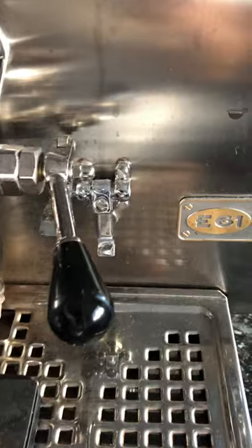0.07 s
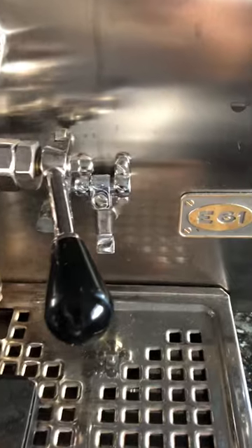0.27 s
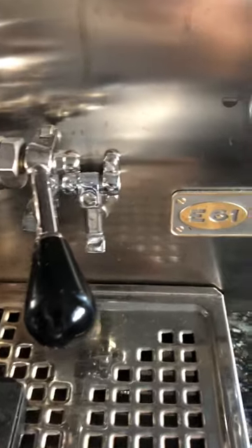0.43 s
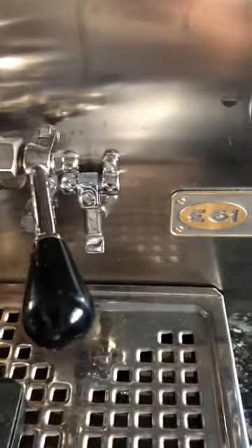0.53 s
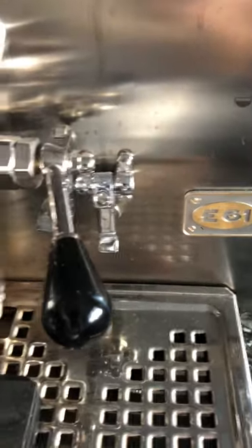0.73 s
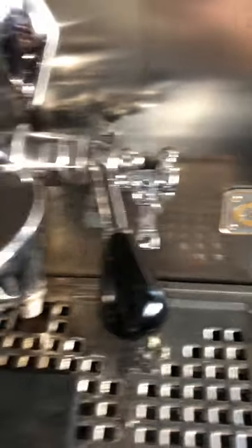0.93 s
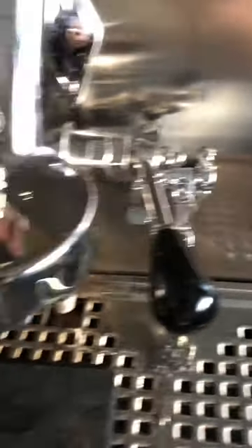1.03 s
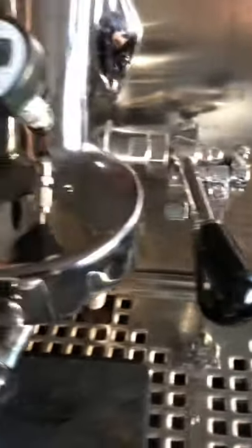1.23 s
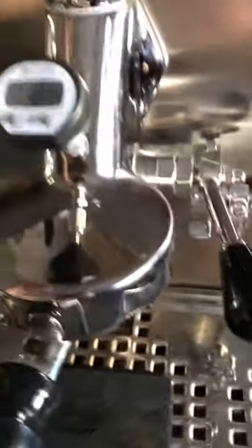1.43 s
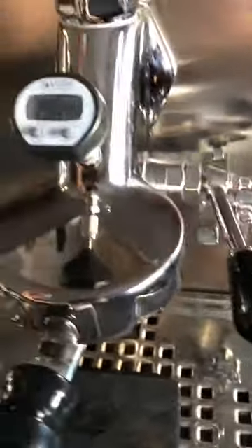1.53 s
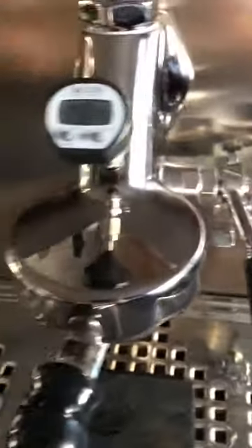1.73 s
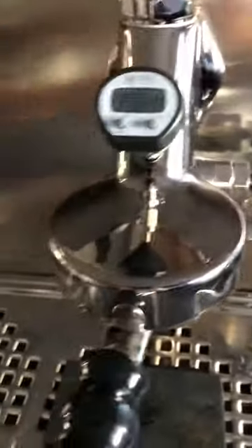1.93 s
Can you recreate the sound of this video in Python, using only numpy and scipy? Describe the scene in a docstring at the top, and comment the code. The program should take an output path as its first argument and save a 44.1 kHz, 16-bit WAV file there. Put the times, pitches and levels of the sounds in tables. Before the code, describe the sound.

An espresso machine's steel lever snaps over at about 0.2 seconds with a sharp clack and quick rebound, briefly ringing the sheet-metal casing. From 0.5 to 1 second, smaller irregular clicks and rattles follow, with a bright clink near 0.7. A soft, low thump comes around 1.1 seconds. Then only the quiet room's low hum remains, with a very faint brushing near 1.8 seconds.

```python
"""Espresso machine lever clack

A steel brew lever snaps over with a clack; small clicks and rattles follow as parts settle.
Every contact shakes the sheet-metal casing, and some ring the lever or a small steel pin.
The quiet room answers briefly over a low hum; late on, something brushes faintly."""
import sys
import numpy as np
from scipy import signal
from scipy.fft import rfft, irfft, next_fast_len
from scipy.io import wavfile
from scipy.ndimage import map_coordinates

SR = 44100
rng = np.random.default_rng(int(sys.argv[2]) if len(sys.argv) > 2 else 0)


def unload_audio(sound):
    """Save the sound as a 16-bit wav file, at the path given as the first command line argument."""
    columns = np.transpose(np.atleast_2d(sound))
    # keep every value between -1 and 1, then stretch to whole-number steps
    steps = np.round(np.clip(columns, -1, 1) * 32767)
    wavfile.write(sys.argv[1], SR, steps.astype(np.int16))


N = 88200
SCENE_T, HIT_T = np.arange(N) / SR, np.arange(SR) / SR  # seconds into the scene, into one hit


def amp(db):
    return 10 ** (np.asarray(db) / 20)


def along(points, hz):
    """Read a curve of (hz, value) points on a log frequency axis."""
    point_hz, values = np.transpose(points)
    return np.interp(np.log(hz + 1), np.log(point_hz + 1), values)


def filtered(x, gain):
    """EQ x with a gain that depends on frequency."""
    size = next_fast_len(len(x) + 8192)
    return irfft(rfft(x, size) * gain(np.fft.rfftfreq(size, 1 / SR)), size)[:len(x)]


def wobble(knots_per_s):
    """A smooth random curve."""
    return map_coordinates(rng.standard_normal(256), [SCENE_T * knots_per_s], mode="wrap")


def hiss(spectrum):
    """Coloured noise of rms 1."""
    noise = filtered(rng.standard_normal(N), lambda f: amp(along(spectrum, f)))
    return noise / np.sqrt(np.mean(noise ** 2))


def envelope(hz, t60, contact_s=0.000042, build_cycles=0.74):
    """A struck part builds over a cycle or so, then decays freely."""
    attack = 1 - np.exp(-HIT_T / (contact_s + build_cycles / hz))
    return attack * np.exp(-np.log(1000) * HIT_T / t60)


def ring(modes, scatter_db=0.3):
    """Decaying modes, a little different at each blow."""
    out = np.zeros(SR)
    for hz, db, t60 in modes:
        level = amp(db + scatter_db * rng.normal())
        out += level * np.sin(2 * np.pi * (hz * HIT_T + rng.random())) * envelope(hz, t60)
    return out


# Colour of the room tone: freq_hz, gain_db
ROOM_TONE_EQ = [(25, -32.5), (70, -8), (150, -13.5), (280, -12), (650, -22), (1200, -29), (2500, -36.5),
                (16000, -44)]
def room_tone(level_db=-62):
    """Steady, dark noise of a quiet room."""
    return amp(level_db) * hiss(ROOM_TONE_EQ)


# Level ride of the lowest hum tone: time_s, level_db
DRONE_RIDE = [(0.16, -61.5), (0.4, -75), (0.95, -62.5), (1.19, -62), (1.3, -70), (1.65, -62), (2, -71)]
# Steady tones above it: pitch_hz, level_db
HUM_TONES = [(120, -70), (238, -69.5)]
def hum(drone_hz=66.1, drift_rad=0.25):
    """Three low tones drift in phase; the lowest swells and sinks."""
    drone_db = np.interp(SCENE_T, *np.transpose(DRONE_RIDE))
    return sum(np.sqrt(2) * amp(db) * np.sin(2 * np.pi * hz * SCENE_T + drift_rad * wobble(4.6))
               for hz, db in [(drone_hz, drone_db)] + HUM_TONES)


# Colour of the brush: freq_hz, gain_db
BRUSH_EQ = [(3000, -11), (8500, -2), (11000, -8), (15000, -1)]
def brush(peak_s=1.785, width_s=0.052, peak_db=-72.5):
    """Something brushes faintly: one soft swell of bright hiss."""
    return amp(peak_db) * np.exp(-((SCENE_T - peak_s) / width_s) ** 2) * hiss(BRUSH_EQ)


# Reverb decay: freq_hz, t60_s
ROOM_DECAY = [(100, 0.74), (700, 0.47), (2000, 0.54), (6000, 0.49), (13000, 0.3)]
# Reverb colour: freq_hz, gain_db
ROOM_EQ = [(100, 1.5), (800, -4), (2000, -2), (6500, -6.5), (13000, -3.5)]
def room(x, build_s=0.0073):
    """Diffuse answer of the room; the treble dies first."""
    hz, t, noise = signal.stft(rng.standard_normal(SR), SR, nperseg=256)
    rate = np.log(1000) / along(ROOM_DECAY, hz)[:, None]
    gain = amp(along(ROOM_EQ, hz))[:, None] * np.sqrt(2 * rate / SR) * np.exp(-rate * t)
    tail = signal.istft(noise * gain, SR, nperseg=256)[1][:SR]
    fade_in = 1 - np.exp(-(HIT_T / build_s) ** 2)
    return signal.fftconvolve(x, tail * fade_in)[:SR]


RING_SEND_DB, NOTE_SEND_DB = -13, -5  # less reverb keeps ringing parts and notes even and short
def place(out, start_s, direct, send=None):
    """Mix in one hit, with the room's answer to its reverb send if it has one."""
    out[round(start_s * SR):][:SR] += direct if send is None else direct + room(send)


# Modes of the casing panels: pitch_hz, gain_db, t60_s
PANEL_MODES = [(483, -17, .5), (705, -18, .3), (790, -13, .25), (941, -9, .22), (1021, -14, .25),
               (1583, -21, .3)]
def panels(db):
    """The sheet-metal panels ring on after a touch."""
    return amp(db) * ring(PANEL_MODES)


# Soft touches: start_s, gain_db
SOFT_TOUCHES = [(0.1915, -35.5), (0.599, -41), (1.068, -42)]
def nudges(out):
    """Touches so light that they only stir the panels."""
    for start_s, db in SOFT_TOUCHES:
        place(out, start_s, panels(db))


def casing_boom(out, start_s=1.075, pitch_hz=123.7, level_db=-46, t60_s=0.49):
    """The casing's lowest mode, set off as the last part settles."""
    place(out, start_s, ring([(pitch_hz, level_db, t60_s)]))


# Thud, panel, clank, clink and crack bands: centre_hz
BAND_CENTRES = [200, 1000, 3300, 6800, 12000]
# Colour of the shell, on top of the band levels: freq_hz, gain_db
SHELL_EQ = [(50, -35), (130, -5), (280, -4), (600, -2.5), (850, 3), (1300, -0.5), (2300, -2.5), (3050, -3),
            (3900, -5.5), (5000, -6), (5800, -2), (7400, -0.5), (8400, -12), (10400, -5.5), (11700, -5),
            (16000, -10.5)]
def shell(t60, levels_db, width_hz=(300, 1400, 2500, 3000, 6500), stretch=(1.6, 1.1, .95, .95, .9)):
    """Crowded, quickly dying resonances of the machine: five noise bands, the lows lasting longest."""
    density_db = [(hz, db - 10 * np.log10(2 * width / SR))
                  for hz, db, width in zip(BAND_CENTRES, levels_db, width_hz)]
    noise = filtered(rng.standard_normal(SR), lambda f: amp(along(density_db, f) + along(SHELL_EQ, f)))
    out = np.zeros(SR)
    for hz, factor, share in zip(BAND_CENTRES, stretch, np.eye(len(BAND_CENTRES))):
        band = filtered(noise, lambda f: along(list(zip(BAND_CENTRES, share)), f))
        out += band * envelope(hz, t60 * factor)
    return out


# Knock, clank and clink notes: gain_db, t60_s
NOTE_SHAPES = [(1, 0.044), (0, 0.045), (2.5, 0.043)]
def notes(note_hz, levels_db, spread=.05, side_db=-8.5):
    """The point of contact favours three short notes; each beats with a weaker mode on either side."""
    modes = [(hz, level + db, t60) for hz, level, (db, t60) in zip(note_hz, levels_db, NOTE_SHAPES)]
    sides = [(hz * (1 + way * spread * (.5 + rng.random())), db + side_db, t60)
             for hz, db, t60 in modes for way in (-1, 1)]
    return ring(modes + sides)


# The clack and the settling clicks: start_s, knock_hz, clank_hz, clink_hz,
# thud_db, panel_db, clank_db, clink_db, crack_db, notes_over_shell_db, base_t60_s
CONTACT_HITS = [ (0.2005, 786, 2850, 6900, -46, -43, -37, -45, -40, -1, .08),
                (0.2076, 760, 3170, 6410, -34, -29.5, -30.5, -28.5, -42, 1.5, .13),
                (0.230, 962, 2660, 7400, -40.5, -33, -38.5, -29.5, -43, 2.5, .12),
                (0.5073, 773, 3150, 6940, -47, -39.5, -39, -43, -67.5, 6.5, 0.089),
                (0.5373, 1142, 2410, 7400, -40.5, -38.5, -49, -52.5, -71, 0.5, 0.11),
                (0.6128, 903, 3490, 7133, -39.5, -40, -37, -34, -58, -0.5, 0.072),
                (0.6755, 907, 2946, 5880, -41.5, -42, -35.5, -28.5, -47, 0.5, 0.054),
                (0.7123, 873, 2330, 5800, -48.5, -38, -48, -49, -72, 0, 0.073),
                (0.7174, 929, 2180, 5600, -54, -31.5, -40, -34.5, -57, -5.5, 0.039),
                (0.738, 901, 2150, 6250, -42, -39, -65, -44, -76, 3, 0.085),
                (0.8166, 1145, 1533, 6860, -49, -37, -42.5, -40.5, -60, 0.5, 0.044),
                (0.8637, 1260, 2070, 5900, -39.5, -38, -41, -47.5, -58, 1, 0.067),
                (0.9033, 907, 2020, 5900, -42, -38.5, -54, -76, -74, -2, 0.053),
                (0.9769, 1005, 1500, 7000, -45, -34, -46, -53, -64, -0.5, 0.087),
                (1.018, 1150, 2987, 5460, -41, -40.5, -48, -49.5, -54.5, -1, 0.12)]
def contacts(out, panel_drive_db=-4):
    """Each contact knocks the shell, sounds its own notes and sets the panels ringing."""
    for start_s, *note_hz, thud, panel, clank, clink, crack, note_db, t60 in CONTACT_HITS:
        knock = shell(t60, (thud, panel, clank, clink, crack))
        note = amp(note_db) * notes(note_hz, (panel, clank, clink))
        casing = panels(panel + panel_drive_db)
        send = knock + amp(NOTE_SEND_DB) * note + amp(RING_SEND_DB) * casing
        place(out, start_s, knock + note + casing, send)


# Ring time of steel parts: freq_hz, t60_s
STEEL_DECAY = [(6000, 0.2), (10000, 0.17), (15000, 0.15)]
def steel(mode_hz, mode_db, chatter_db=3.5, chatter_per_s=95.2):
    """A loose steel part chatters as it rings, and its higher modes die sooner."""
    chatter = amp(chatter_db * wobble(chatter_per_s)[:SR])
    return chatter * ring([(hz, db, along(STEEL_DECAY, hz)) for hz, db in zip(mode_hz, mode_db)])


# Modes of the pin: pitch_hz
PIN_PITCHES = [5340, 5696, 5880, 9685, 10665, 12325, 15572]
# Their balance: gain_db
PIN_GAINS = [-3, -9, -8, -25, -16, -6, -11]
# Strikes on the pin: start_s, gain_db, favoured_hz, boost_db
PIN_STRIKES = [(0.614, -58, 5330, 12.5), (0.6753, -36, 15572, 7), (0.718, -49, 9685, 21.5),
               (0.8635, -56.5, 10665, 16.5), (1.018, -49.5, 10665, 15.5)]
def pin(out, width_octaves=.06):
    """The small steel pin is caught at a new spot each time, which favours one of its modes."""
    for start_s, db, favoured_hz, boost_db in PIN_STRIKES:
        octaves_off = np.log2(np.array(PIN_PITCHES) / favoured_hz)
        favour = np.exp(-(octaves_off / width_octaves) ** 2)
        ping = amp(db) * steel(PIN_PITCHES, PIN_GAINS + boost_db * favour)
        place(out, start_s, ping, amp(RING_SEND_DB) * ping)


# Modes of the lever with its valve: pitch_hz
LEVER_PITCHES = [2595, 2934, 5840, 5922, 6112, 6799, 6977, 7160, 7277, 7326, 7485, 9690, 10125, 10627,
                 12460, 13082, 15650]
# Their balance: gain_db
LEVER_GAINS = [-15, -9, -9, -9, -8.5, -6, -4, -9.5, -8.5, -10.5, -3.5, -16, -4, -7, -16, -7.5, -19]
# The snap and its rebounds: start_s, gain_db
LEVER_BLOWS = [(0.2082, -29), (0.2144, -40.5), (0.230, -34)]
def lever(out, panel_drive_db=3.5):
    """The lever snaps over and rebounds, ringing its steel and driving the panels hard."""
    for start_s, db in LEVER_BLOWS:
        clack = amp(db) * steel(LEVER_PITCHES, LEVER_GAINS) + panels(db + panel_drive_db)
        place(out, start_s, clack, amp(RING_SEND_DB) * clack)


def scene():
    """The machine in its room, in mono."""
    machine = np.zeros(N + SR)
    for source in (contacts, lever, pin, nudges, casing_boom):
        source(machine)
    return (machine[:N] + hum() + brush() + room_tone())[None]


def record(dry, top_hz=15850):
    """A steep low-pass takes off the very top."""
    return np.array([filtered(x, lambda f: 1 / np.sqrt(1 + (f / top_hz) ** 160)) for x in dry])


dry = scene()
out = record(dry)
unload_audio(out)
```